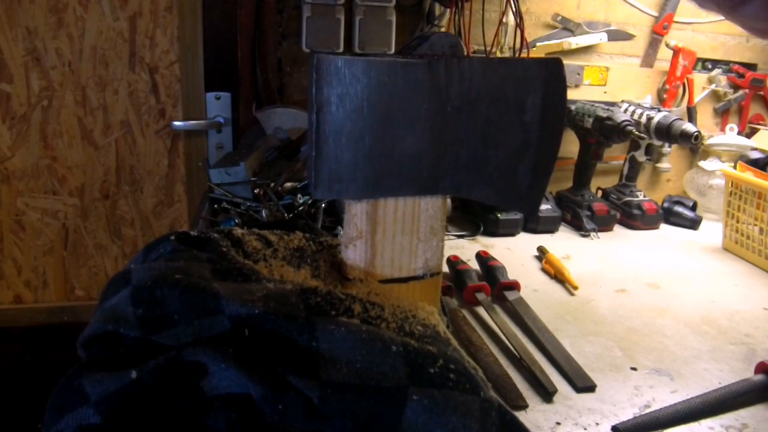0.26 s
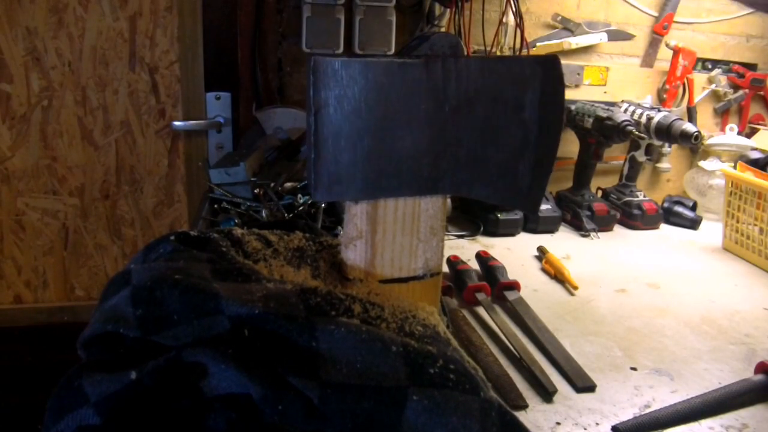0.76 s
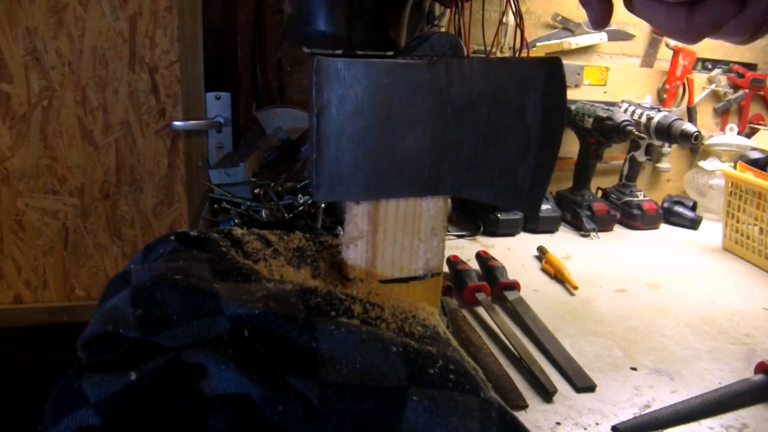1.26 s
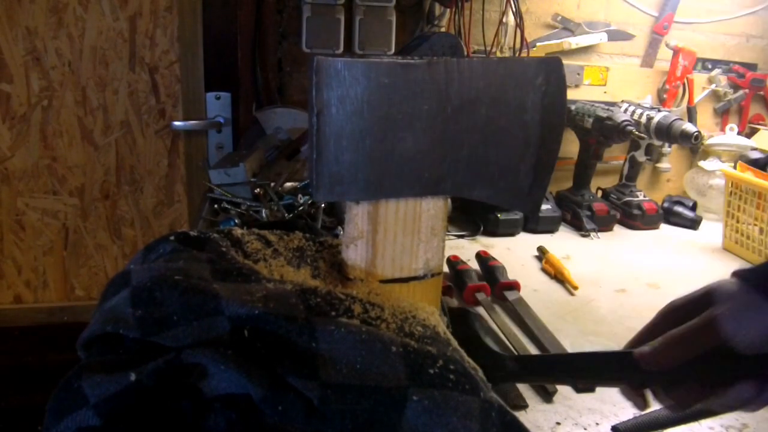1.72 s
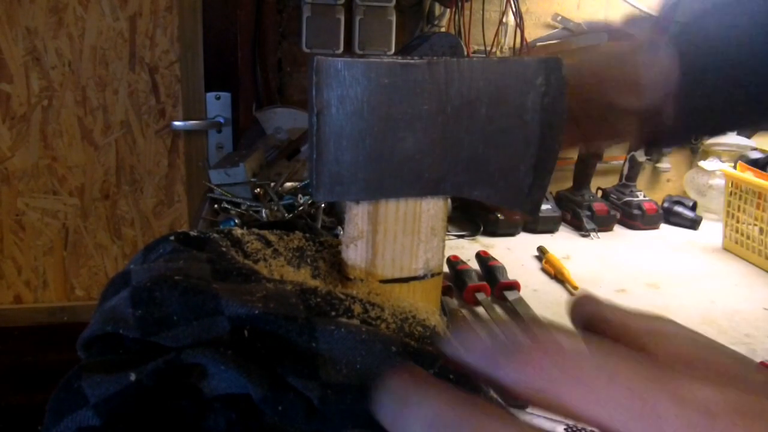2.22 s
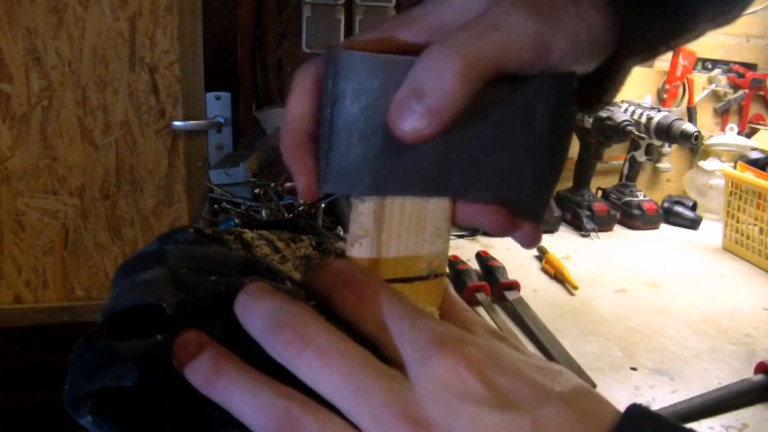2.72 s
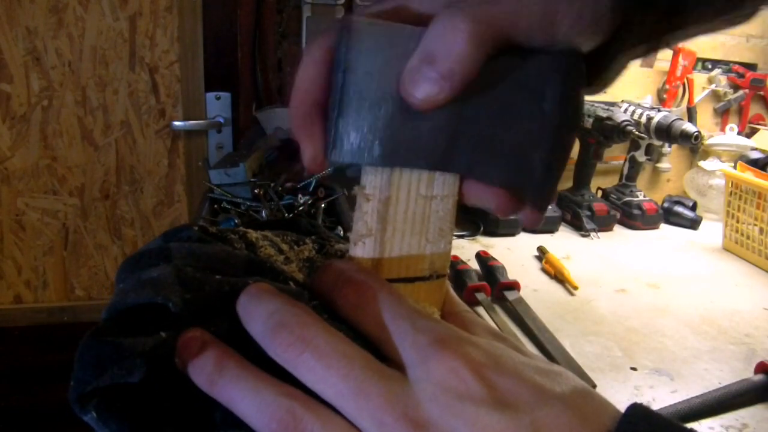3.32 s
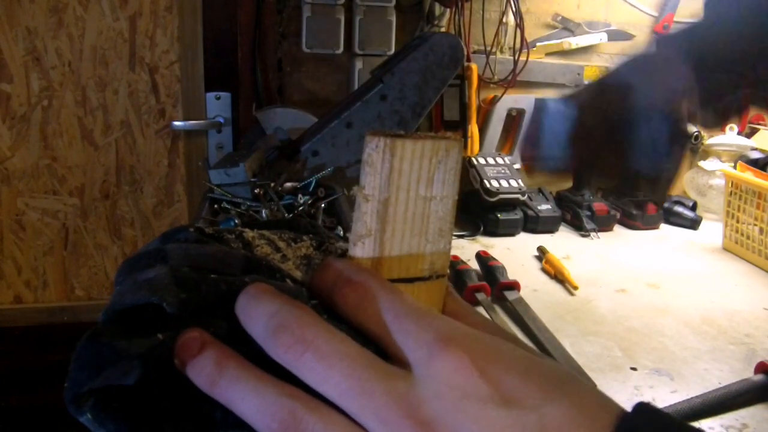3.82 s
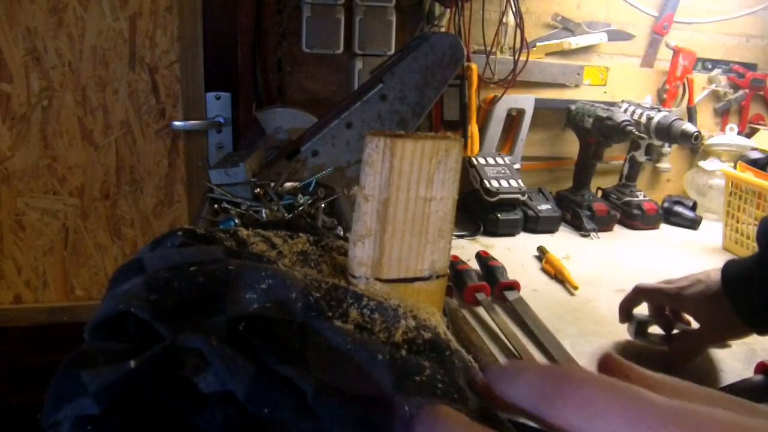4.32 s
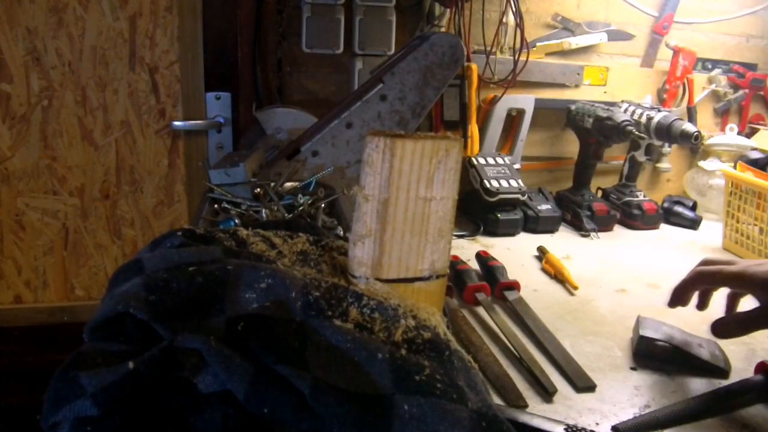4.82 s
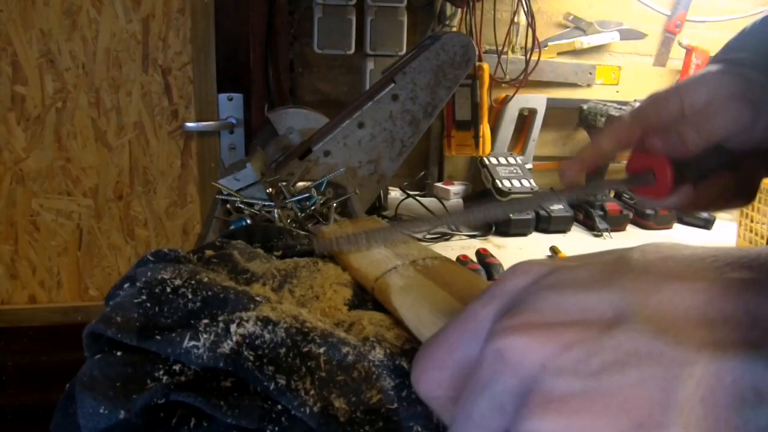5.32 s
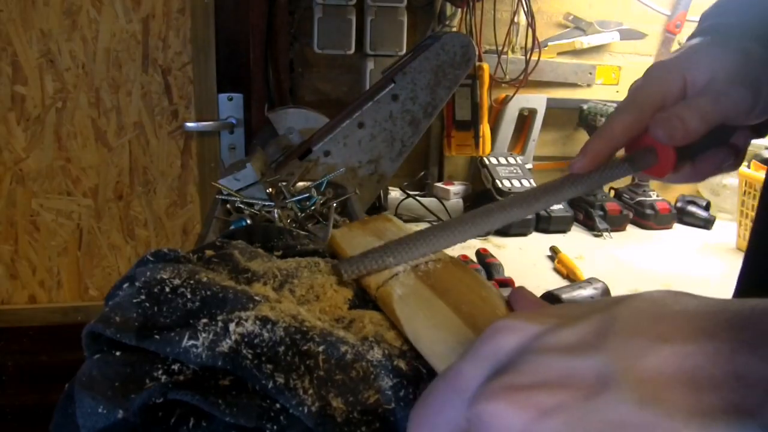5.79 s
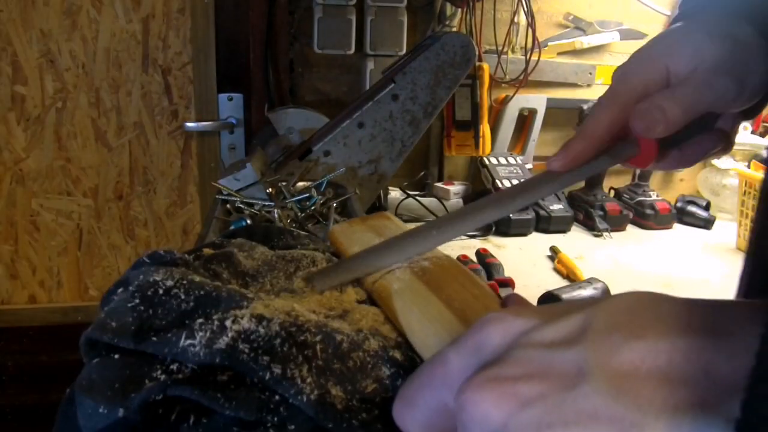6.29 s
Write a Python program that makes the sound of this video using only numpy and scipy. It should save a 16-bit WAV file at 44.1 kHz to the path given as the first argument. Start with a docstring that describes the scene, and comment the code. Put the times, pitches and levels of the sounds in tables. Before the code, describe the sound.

Six loud hammer taps on a steel axe head in a small workshop, then tools thud on the bench, hands rustle, and a file starts rasping.

```python
"""First the fading tail of a hammer tap, then six taps seating an axe head on its handle in a small
wooden workshop. Tools drop and rattle on the bench, hands and sleeves rustle, and after a short gap in
the sound a file starts a stroke. Struck things are decaying modes plus a crack of noise, with room tails
in noise bands; hands, rumble and file are shaped noise. The camera microphone, close by, hisses, turns
itself down on loud blows and limits their peaks."""
import sys
import numpy as np
from scipy import signal
from scipy.fft import rfft, irfft
from scipy.io import wavfile
from scipy.ndimage import uniform_filter1d, minimum_filter1d

SR = 44100
rng = np.random.default_rng(int(sys.argv[2]) if len(sys.argv) > 2 else 0)


def waveform_to_disk(signal):
    """Save audio, clipped to [-1, 1], as 16-bit WAV at the path in sys.argv[1]."""
    frames = np.transpose(np.atleast_2d(signal))
    scaled = np.clip(frames, -1, 1) * 32767
    samples = np.round(scaled).astype(np.int16)
    wavfile.write(sys.argv[1], SR, samples)


N = 288855
HZ, T = np.fft.rfftfreq(N, 1 / SR), np.arange(N) / SR

# All levels stand ahead of the microphone's gain stages; colours give only the shape of a spectrum.
# Microphone hiss and room tone. Each row: frequency in Hz, level in dB per Hz.
HISS_COLOUR = [(15, -51), (25, 10), (64, 4.5), (149, -16), (195, -14), (249, -10.5), (775, -12),
               (1260, -20), (1940, -21.5), (4250, -37), (6920, -22), (12200, -46), (13600, -61),
               (14800, -74), (16000, -52)]
HISS_DB = -48.5
# Left-right likeness of room and rumble, then of hiss and hands. Each row: frequency in Hz, likeness -1 to 1.
ROOM_LIKENESS = [(60, 1), (150, 1.0), (380, 0.99), (950, 0.98), (2380, 0.86), (5980, 0.11), (15000, 0.36)]
CLOSE_LIKENESS = [(60, 1), (150, 0.78), (380, 0.97), (950, 0.9), (2380, 0.64), (5980, 0.21), (15000, -0.2)]

# Low rumble of bench and camera mount. Each row: time in seconds, level in dB before its lumps.
RUMBLE_LEVEL = [(1.9, -50), (2.34, -52), (2.51, -33), (2.87, -49.5), (3.35, -45.5), (4.2, -58), (4.85, -51),
                (5.02, -26), (5.25, -48), (5.58, -52), (5.61, -36), (6.55, -36)]
# Each row: frequency in Hz, level in dB per Hz.
RUMBLE_COLOUR = [(12, -53), (20, -3.5), (92, 4), (208, 0.5), (270, -6), (387, -9), (733, -38), (849, -34),
                 (1000, -25), (1300, -64), (2200, -120)]

# Room decay. Each row: frequency in Hz, 60 dB decay in seconds (scaled per source), build-up in seconds.
ROOM_DECAY = [(40, 0.82, 0.087), (152, 0.83, 0.0095), (363, 0.46, 0.0023), (1000, 0.36, 0.0084),
              (2710, 0.33, 0.0009), (8000, 0.3, 0.0024)]
# Wall resonances. Each row: centre in Hz, width in Hz, power added in dB against the rest.
WALL_RESONANCES = [(157, 21, 10.5), (251.6, 5.4, 7.5), (289, 18, 6), (332.4, 8.7, 10.5), (566.5, 17, 5.5),
                   (663, 40, 10), (724, 13, 9.5), (1148, 55, 2.5), (1350, 31, -4), (1638, 53, 2),
                   (1765, 28, 3.5), (1980, 11, 8), (2180, 13, 8), (2360, 9.7, -16)]
# Tails of taps, thuds and knocks. Each: length against the room's decay, brightness in dB per octave,
# drift of that brightness per second (for the taps, as the head seats).
TAP_TAIL = (0.8, 1.02, -1.05)
THUD_TAIL = (0.53, .1, 0)
KNOCK_TAIL = (0.44, .1, 0)
# Colours of those tails ahead of that tilt. Each row: frequency in Hz, level in dB per Hz.
TAP_COLOUR = [(24, -35), (40, -7), (87, -7.5), (290, -5.5), (556, -3.5), (600, -8), (646, -6), (990, -16),
              (1810, -9.5), (4340, -33), (7730, -24.5), (10700, -45.5), (16000, -63)]
THUD_COLOUR = [(24, -61), (40, -55), (112, -50), (155, -9.5), (290, -4.5), (329, 19), (422, -7), (585, 2.5),
               (1090, -16), (1810, -16.5), (3740, -41), (6650, -43), (16000, -64)]
KNOCK_COLOUR = [(24, -37), (40, -17), (402, -3), (585, 3.5), (896, -5), (1040, -9), (1850, 3.5),
                (2260, -10.5), (7170, -17.5), (11000, -25), (16000, -74)]

# Hands at work. Each row: time in seconds, sleeve rustle in dB, sliding on wood in dB, duller drag in dB;
# each is then trimmed and made to flicker by its source.
HAND_LEVELS = [(0.0, -48.5, -81, -75), (1.8, -45.5, -57, -60), (1.96, -46, -63, -45),
               (2.3, -55, -52, -51.5), (2.6, -42.5, -44, -25), (2.77, -47.5, -46.5, -37.5),
               (2.97, -52, -48, -42), (3.05, -57.5, -55, -66), (3.23, -51.5, -49.5, -38),
               (3.35, -52.5, -50.5, -45), (3.42, -54.5, -54, -57), (3.6, -49.5, -55, -55),
               (3.68, -57, -65, -54), (3.76, -47.5, -45, -41), (4.1, -55, -56, -58), (4.7, -52, -55, -47.5),
               (5.2, -48.5, -59, -38.5), (5.54, -54.5, -63, -58), (5.68, -54, -51, -43),
               (5.75, -51, -43, -43), (5.95, -52, -63, -46), (6.1, -53, -49.5, -46.5),
               (6.55, -52.5, -52, -40)]
# Colours of rustle, sliding and drag. Each row: frequency in Hz, level in dB per Hz.
RUSTLE_COLOUR = [(800, -54), (1500, 4.5), (3000, -1), (4500, -7), (6500, 1.5), (8000, -4.5), (9500, -2.5),
                 (12000, -9.5), (15000, -17)]
SCUFF_COLOUR = [(400, -54), (800, -15), (1300, -6), (1950, -4), (2400, -7), (3200, -10.5), (5000, -12),
                (9000, -70)]
DRAG_COLOUR = [(80, -32), (150, -49), (300, 9), (500, 1), (750, -4), (1200, -11), (2000, -74)]

# Small bright ticks. Each row: start in seconds, peak in dB, pitch in Hz, duller ring in dB.
CLEAR_TICKS = [(3.3543, -34.5, 5850, -39), (3.4994, -33, 5400, -39), (3.756, -26, 6050, -36),
               (4.3086, -39, 6520, -45), (4.5067, -33, 6240, -50), (4.557, -37, 6350, -48),
               (5.3263, -35.5, 6400, -57), (5.492, -40, 6340, -62), (5.796, -35, 6340, -62),
               (5.9559, -36, 7100, -49), (6.024, -36, 8890, -55), (6.295, -30, 5600, -49),
               (6.3574, -36.5, 9180, -47)]
# A thin squeak. Each row: time in seconds, pitch in Hz, level in dB; pitch and level waver about these.
SQUEAK_PATH = [(4.19, 1920, -60), (4.27, 2020, -58), (4.35, 2030, -48.5), (4.46, 2020, -63)]
# File stroke. Each row: time in seconds, pressure in dB before a 4 dB lift.
STROKE_PRESSURE = [(6.41, -53), (6.44, -42), (6.482, -25.5), (6.55, -13)]
# Colour of the file on wood. Each row: frequency in Hz, level in dB per Hz.
RASP_COLOUR = [(40, 4.5), (145, -4), (350, -2.5), (700, -13.5), (900, -4.5), (1050, -11), (1350, -19.5),
               (1960, -13), (2500, -19), (3200, -18), (3700, -31), (9600, -39), (15000, -68)]

# Blows. Each row: start in seconds, blow in dB, crack in dB against the blow (before a 1.5 dB cut),
# room tail in dB against the blow.
# Hammer on the steel head; the early tap falls just before the start, so only its tail is heard.
EARLY_TAP = (-.12, 2, -14, -12)
TAPS = [(0.186, 5, -1.5, -12), (0.486, 7.6, -6.5, -11), (0.783, 6.1, -6, -12), (1.099, 4.9, -5, -10.5),
        (1.389, 1.9, 0, -10), (1.675, 3.2, -4.5, -8.5)]
# Heavy tools landing and bouncing on the bench.
THUDS = [(2.357, 2, -26, -6.5), (2.37, 1.5, -34, -10), (2.388, 8, -11, -10), (2.416, 1, -36, -4.5),
         (2.477, -2.5, -35, -7.5), (2.499, -7.5, -37, -2), (2.801, -31, -20, -13.5),
         (4.8455, 6.5, -23.5, -8.5), (4.856, 1, -42, -18.5), (4.889, -1.5, -37, -10),
         (4.934, -0.5, -26, -13.5), (4.967, 8, -23.5, -12), (4.989, -0.5, -28, -7), (5.061, 1.5, -40, -12),
         (5.074, -1, -41, -16)]
# Lighter knocks of steel on wood.
KNOCKS = [(3.849, -26, -15, -3), (3.859, -9.5, -18, -13), (3.865, -8.5, -13, -17), (3.875, -10.5, -20, -19)]
# The file laid on the handle.
TOUCHES = [(5.851, -15, -33, -19), (6.435, -29.5, -25, -13), (6.479, -16.5, -17, -19)]
# Modes of axe head, bench, wood block and handle. Each row: frequency in Hz, level in dB,
# 60 dB decay in seconds (held to 0.01-0.045 s when struck); pitch and level scatter blow by blow.
HEAD_MODES = [(585, -1.5, 0.12), (880, 4.5, 0.34), (1124, 7.5, 0.036), (1490, -22, 0.023),
              (1650, 4.5, 0.036), (1919, 1, 0.088), (2273, -3, 0.3), (3666, -10, 0.061), (5630, -49, 0.049),
              (6740, -47, 0.032), (7600, -48, 0.2), (7760, -26.5, 0.058)]
BENCH_MODES = [(245, -18, 0.075), (357, -0.5, 0.088), (385, -2, 0.03), (501, 4, 0.067), (573.4, 6, 0.046),
               (640, -25, 0.05), (821, -0.5, 0.055), (1058, -4.5, 0.064), (1185, -6.5, 0.056),
               (1660, -23, .02)]
BLOCK_MODES = [(580, -15, 5.0), (732, -9, 0.073), (1054, -5, 0.32), (1606, 1, 0.063), (1807, 2.5, 0.14),
               (2790, -7.5, 0.074), (3275, -3, 0.13), (3350, -13, 0.027), (3500, -11, 5.0),
               (4020, -10.5, 0.085)]
HANDLE_MODES = [(382, 0, 0.034), (613, -8, .05), (895, 4, 0.051), (1020, 0, 0.032), (1290, -7, 0.043),
                (1935, -4, 0.038), (2300, -17, 0.027), (2650, -15, 0.027)]

# Balance of the two microphone ports. Each row: frequency in Hz, left minus right in dB.
PORT_BALANCE = [(500, -0.03), (2000, 0.5), (4000, 1.6), (8000, -1.5), (12000, -2.5)]
# The sound drops out: from seconds, to seconds.
GAP = (5.568, 5.600)
EDGE_HZ = 15700  # upper band limit of the microphone chain


def amp(db):
    """Turns decibels into gain."""
    return 10 ** (np.asarray(db) / 20)


def unit(x):
    """Scales to rms 1."""
    return x / np.sqrt(np.mean(x ** 2) + 1e-20)


def read(points, hz, axis=1):
    """Reads a table column on a log-frequency axis."""
    points = np.asarray(points)
    return np.interp(np.log(hz + 1), np.log(points[:, 0] + 1), points[:, axis])


def level(rows):
    """Gain in time from rows of seconds and dB."""
    return amp(np.interp(T, *np.transpose(rows)))


def add(mix, s, sound):
    """Mixes a sound in at s seconds."""
    part = mix[round(s * SR):][:len(sound)]
    part += sound[:len(part)]


def noise(colour_db, likeness):
    """Spectra of two noise channels that share part of their sound."""
    a, b = rfft(rng.standard_normal((2, N)))
    shared = np.clip(read(likeness, HZ), -1, 1)
    right = shared * a + np.sqrt(1 - shared ** 2) * b
    return amp(colour_db) * np.array([a, right])


def coloured_noise(colour, likeness):
    """Steady stereo noise of rms 1 in a table's colour."""
    return unit(irfft(noise(read(colour, HZ), likeness), N))


def wander(rate):
    """Slow random curve of rms 1, smoothed twice over 1/rate seconds."""
    width = int(SR / rate)
    return unit(uniform_filter1d(uniform_filter1d(rng.standard_normal(N), width), width))


def hiss():
    """Steady room tone and microphone hiss: noise at a constant level."""
    return amp(HISS_DB) * coloured_noise(HISS_COLOUR, CLOSE_LIKENESS)


def rumble():
    """Lumpy bass noise of bench and mount, much alike on both sides."""
    lumps = amp(2.44 * wander(17))
    return level(RUMBLE_LEVEL) * lumps * coloured_noise(RUMBLE_COLOUR, ROOM_LIKENESS)


def tails():
    """Room and bench fill up after each blow, bass last, and die band by band; wall resonances colour it."""
    walls = 1 + sum(amp(db) ** 2 / (1 + (2 * (HZ - hz) / width) ** 2) for hz, width, db in WALL_RESONANCES)
    air = noise(10 * np.log10(walls), ROOM_LIKENESS)
    centres, step = np.geomspace(40, 15000, num=22), T[::32]
    t60 = read(ROOM_DECAY, centres)[:, None]
    rise = read(ROOM_DECAY, centres, axis=2)[:, None]
    kinds = [([EARLY_TAP] + TAPS, TAP_COLOUR, TAP_TAIL),
             (THUDS, THUD_COLOUR, THUD_TAIL),
             (KNOCKS + TOUCHES, KNOCK_COLOUR, KNOCK_TAIL)]
    power = np.zeros((len(centres), len(step)))
    for events, colour, (length, bright_db, drift_db) in kinds:
        share = amp(read(colour, centres)) ** 2 * centres
        share = share / share.sum()
        for s, blow_db, _, tail_db in events:
            age = np.maximum(step - s, 0)
            tilt_db = (bright_db + drift_db * s) * np.log2(centres / 1000)
            start = amp(blow_db + tail_db + tilt_db) ** 2 * share
            build_up = (1 - np.exp(-age / rise)) ** 2
            decay = amp(-60 * (age / (length * t60)) ** 1.195) ** 2  # holds, then drops
            power += start[:, None] * build_up * decay

    place = np.interp(np.log(HZ + 1), np.log(centres), np.arange(len(centres)))
    rattle = [wander(55) for _ in range(4)]  # loose tools make the tail lumpy
    out = np.zeros((2, N))
    for k, band_power in enumerate(power):
        crossfade = np.cos(np.pi / 2 * np.clip(place - k, -1, 1))  # overlaps the neighbouring bands
        band = unit(irfft(air * crossfade, N))
        out += band * np.interp(T, step, np.sqrt(band_power)) * amp(0.87 * rattle[k // 6])
    return out


def hands(axis):
    """Gain in time of one column of the hand table."""
    return level(np.array(HAND_LEVELS)[:, [0, axis]])


def rustle():
    """Cloth and skin close to the microphone: flickering bright noise."""
    flicker = amp(1.5 * wander(90) - 0.5)
    return hands(axis=1) * flicker * coloured_noise(RUSTLE_COLOUR, CLOSE_LIKENESS)


def scuff():
    """Sliding on wood: lumpy noise, a wavering chirp near two kilohertz and a duller drag under it."""
    bright = coloured_noise(SCUFF_COLOUR, CLOSE_LIKENESS)
    dull = coloured_noise(DRAG_COLOUR, CLOSE_LIKENESS)
    turns = np.cumsum(2000 + 170 * wander(13)) / SR
    chirp = amp(-2.5 + 3.9 * wander(21)) * wander(400) * np.sin(2 * np.pi * turns)
    lumps = amp(3.4 * wander(25.0) - 6.0)
    return (hands(axis=2) * (bright + chirp) + hands(axis=3) * dull) * lumps


def ticks():
    """Bright ticks of a few cycles with a short fizz and a duller ring; faint ones fall at random."""
    out, t = np.zeros(N), T[:1500]
    faint = [(s, -50 + 15.3 * a, 5500 + 4500 * b, -70) for s, a, b in rng.random((120, 3)) * [N / SR, 1, 1]]
    for s, db, hz, ring_db in CLEAR_TICKS + faint:
        tone = amp(db - 60 * t / 0.0042) * np.sin(2 * np.pi * hz * t)
        fizz = signal.lfilter(*signal.iirpeak(hz, 2.5, SR), rng.standard_normal(len(t)))
        fizz *= amp(db - 8.0 - 60 * t / 0.1)
        ring = unit(signal.lfilter(*signal.iirpeak(2300, 1.5, SR), rng.standard_normal(len(t))))
        ring *= amp(ring_db - 60 * t / 0.024)
        add(out, s, tone + fizz + ring)
    return out


def squeak():
    """A thin tone, slightly rough because its pitch and level waver."""
    s, hz, db = np.transpose(SQUEAK_PATH)
    turns = np.cumsum(np.interp(T, s, hz) + 12 * wander(160)) / SR
    gain = amp(np.interp(T, s, db, -120, -120) + 1.4 * wander(50))
    return np.sqrt(2) * gain * np.sin(2 * np.pi * turns)


def file_stroke():
    """Teeth catch the fibres in uneven bites over steady noise, both coloured by file and wood."""
    bite_size = amp(8.4 * np.minimum(rng.exponential(1, N), 3))
    caught = rng.random(N) < 500 / SR  # about 500 bites a second
    bites = bite_size * caught * rng.choice([-1, 1], N)
    taps = np.fft.fftshift(irfft(amp(read(RASP_COLOUR, np.fft.rfftfreq(2048, 1 / SR)))))
    grains = unit(signal.oaconvolve(unit(bites) + 1.4 * rng.standard_normal(N), taps, "same"))
    return amp(np.interp(T, *np.transpose(STROKE_PRESSURE), left=-120) + 4.0) * grains


def blows(events, modes, spread_db):
    """Each blow rings the modes in its own proportions and starts with a short crack."""
    out, t = np.zeros(N), T[:SR // 4]
    hz, db, t60 = (c[:, None] for c in np.transpose(modes))
    for s, blow_db, crack_db, _ in events:
        level_luck, pitch_luck, phase_luck = rng.standard_normal((3, len(modes), 1))
        gain = amp(db + spread_db * level_luck - 60 * t / np.clip(t60, .01, .045))
        phase = 2 * np.pi * hz * (1 + 0.028 * pitch_luck) * t + 0.37 * phase_luck
        ring = (gain * np.sin(phase)).sum(0)
        ring *= (1 - np.exp(-t / 0.00083)) ** 2  # contact takes about a millisecond
        crack = signal.lfilter(*signal.butter(3, 5200, fs=SR), rng.standard_normal(len(t)))
        crack *= amp(crack_db - 1.5 - 60 * t / 0.012) * (1 - np.exp(-t / 0.00023))
        add(out, s, amp(blow_db) * (ring / abs(ring).max() + crack))
    return out


def scene():
    """Background and close sources; the close ones differ a little between the microphone ports."""
    background = hiss() + rumble() + tails() + rustle() + scuff()
    near = ticks() + squeak() + file_stroke()
    near += blows(TOUCHES, HANDLE_MODES, spread_db=1.5)
    near += blows(KNOCKS, BLOCK_MODES, spread_db=1)
    near += blows(THUDS, BENCH_MODES, spread_db=7.5)
    near += blows(TAPS, HEAD_MODES, spread_db=5.0)
    side = 0.64 * np.roll(np.diff(near, prepend=0), 9)  # the spacing of the ports shows only in the treble
    return np.array([near + side, near - side]) + background


def record(dry):
    """Port balance, a gain control too slow for the first milliseconds, a limiter, the gap, the band limit."""
    lean = read(PORT_BALANCE, HZ) / 2
    x = irfft(rfft(dry) * amp([lean, -lean]), N)

    lag = np.exp(-1 / (0.003 * SR))  # 3 ms smoothing
    smooth = [1 - lag], [1, -lag]
    power_db = 10 * np.log10(signal.lfilter(*smooth, (x ** 2).mean(0)) + 1e-12)
    fall = T * 150  # recovers this many dB a second
    held_db = np.maximum.accumulate(power_db + fall) - fall
    over_db = np.maximum(held_db + 31.5, 0)  # threshold at -31.5 dB
    x = amp(2.0) * x / amp(0.36 * signal.lfilter(*smooth, over_db))

    room_left = minimum_filter1d(1 / np.maximum(abs(x).max(0), 1), size=121)
    x = x * uniform_filter1d(room_left, size=61)  # a limiter holds the peaks at full scale

    sounding = ((T < GAP[0]) | (T > GAP[1])) * 1.
    x = x * uniform_filter1d(sounding, size=80)
    low_pass = signal.firwin(511, EDGE_HZ, window=("kaiser", 9), fs=SR)
    return signal.oaconvolve(x, low_pass[None], "same")


dry = scene()
out = record(dry)
waveform_to_disk(out)
```